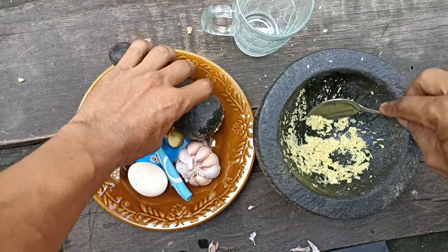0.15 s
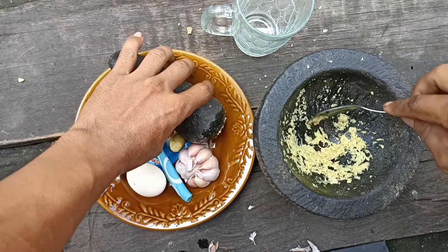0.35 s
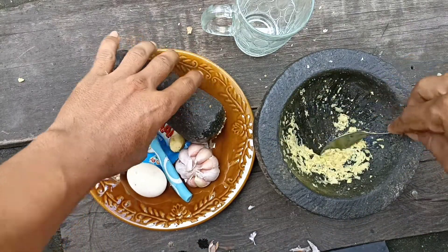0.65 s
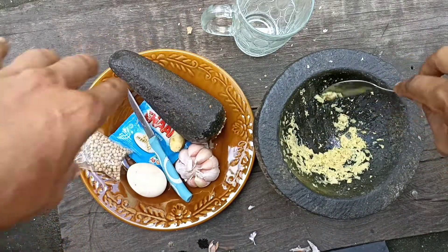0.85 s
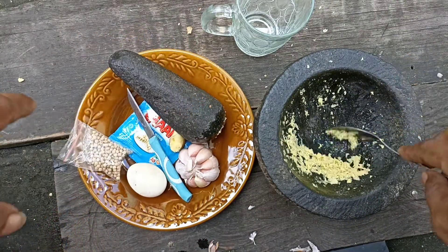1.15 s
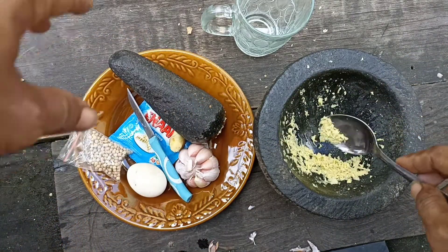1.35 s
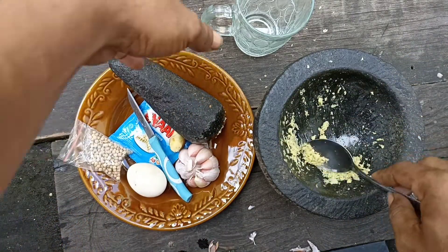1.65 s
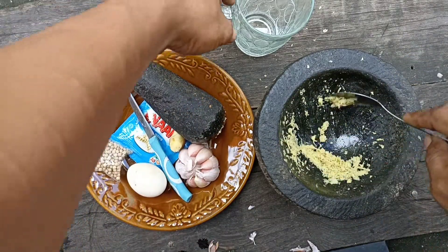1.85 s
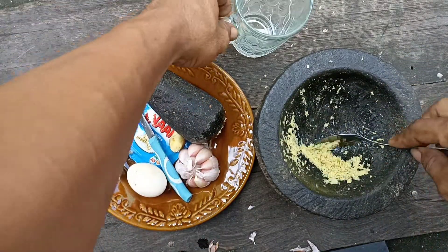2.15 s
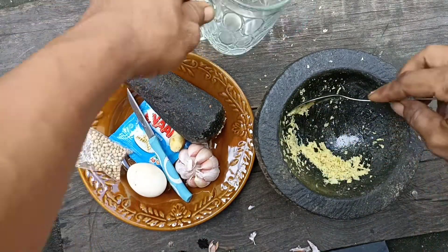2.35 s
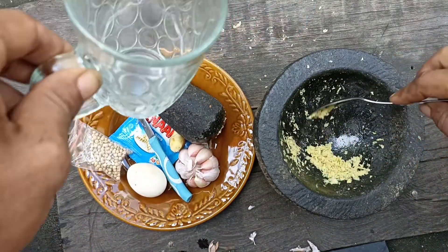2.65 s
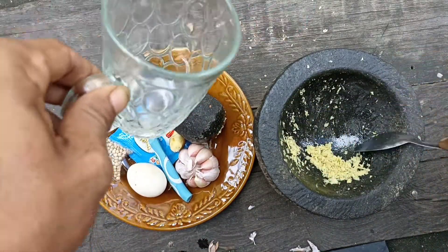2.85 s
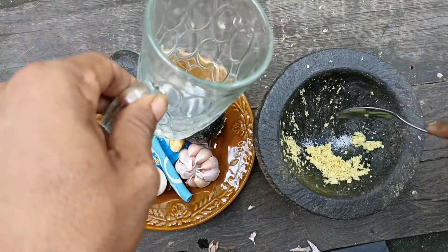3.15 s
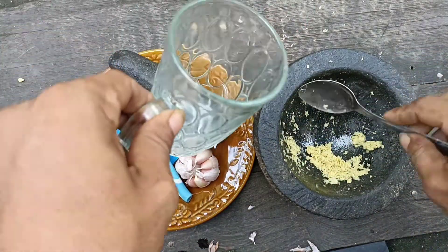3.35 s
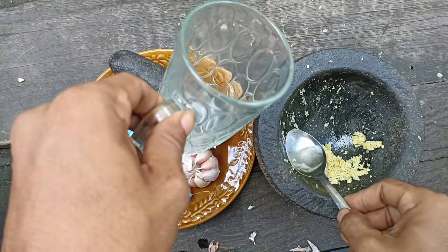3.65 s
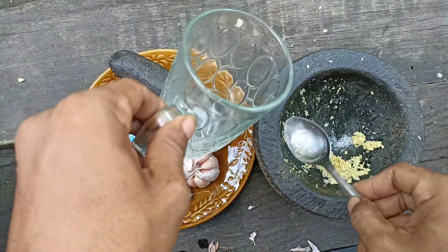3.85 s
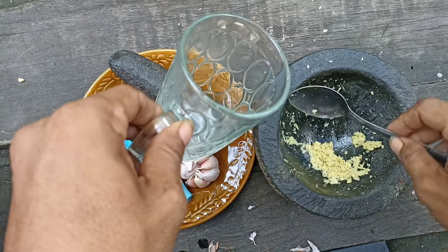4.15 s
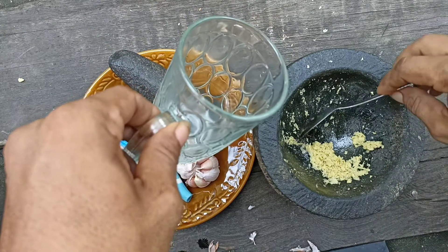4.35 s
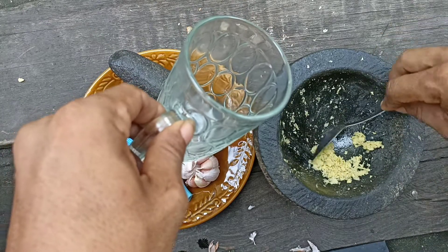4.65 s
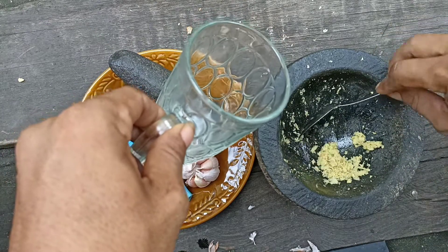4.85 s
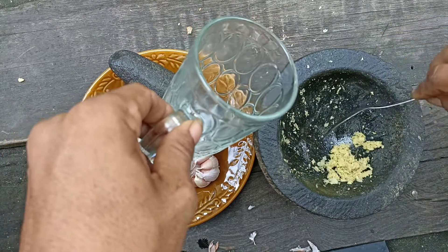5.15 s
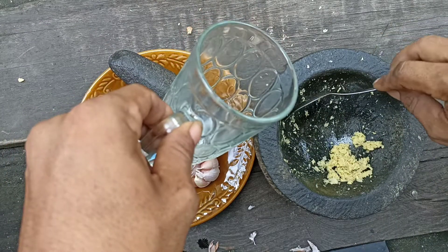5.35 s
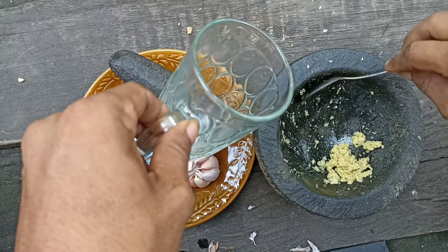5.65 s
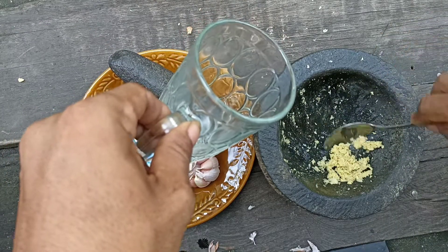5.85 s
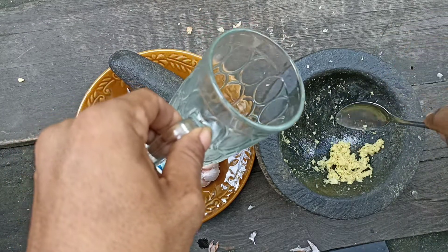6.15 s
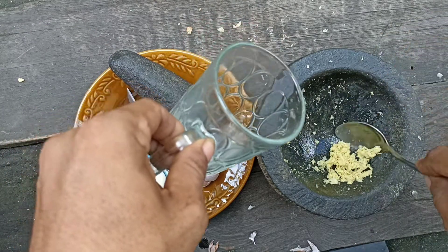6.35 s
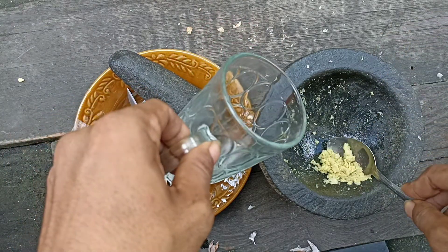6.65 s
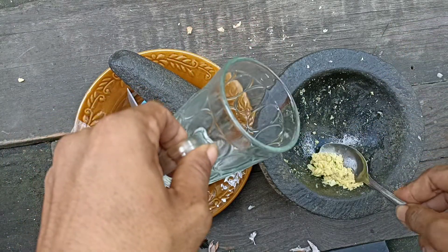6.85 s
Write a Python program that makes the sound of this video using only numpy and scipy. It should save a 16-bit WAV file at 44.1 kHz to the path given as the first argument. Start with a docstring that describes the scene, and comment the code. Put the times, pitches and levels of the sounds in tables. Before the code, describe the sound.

Short bright rasps and sharp clicks of a steel spoon in a stone mortar, after a quick pestle rattle on a plate, over faint outdoor rumble.

```python
"""A steel spoon taps and scrapes paste round a stone mortar; at the start a stone pestle clatters on a plate.
Grit under the spoon's edge is a train of clumped clicks, convolved with the ring of stone and steel.
Knocks and bumps are half-sine pushes that excite the decaying modes of the plate and the wooden table.
Outdoor air with a distant, swelling rumble is shaped random spectra; a faint low note is a decaying sine.
A short diffuse return is added, and two close microphone ports of unlike colour pick up the whole."""
import sys
import numpy as np
from scipy import signal
from scipy.fft import rfft, irfft, next_fast_len
from scipy.io import wavfile
from scipy.ndimage import uniform_filter1d

SR = 44100
rng = np.random.default_rng(int(sys.argv[2]) if len(sys.argv) > 2 else 0)


def generate_wav(signal):
    """Clip the signal to [-1, 1] and save it as 16-bit WAV at the path in sys.argv[1]."""
    frames = np.transpose(np.atleast_2d(signal))
    scaled = np.clip(frames, -1, 1) * 32767
    pcm = np.round(scaled).astype(np.int16)
    wavfile.write(sys.argv[1], SR, pcm)


N = 309385  # length in samples

# Drags of the spoon's edge; hollow and shine are relative to the rasp, at full pressure:
# start_s, rise_s, hold_s, fall_s, rasp_level_db, hollow_db, first_pitch_hz, last_pitch_hz, shine_db
STROKES = [(0.0, 0.00067, 0.012, 0.028, -29.5, -3.3, 2940, 2960, 3),
           (0.024, 0.005, 0.099, 0.12, -29, 1.5, 3800, 3000, -3),
           (0.137, 0.0405, 0.0275, .07, -26, -5, 3500, 3600, 2),
           (0.34, 0.013, 0.027, 0.087, -67.5, 22, 2210, 2320, -5),
           (0.454, 0.034, 0.037, 0.035, -35, -10.5, 3457, 3500, 0),
           (0.744, 0.033, 0.066, .012, -55, 6.5, 1580, 1680, -1),
           (0.844, 0.0033, 0.17, 0.049, -30.5, 1.5, 4170, 2696, 7.5),
           (1.534, 0.014, 0.051, 0.035, -27.5, 8.5, 1958, 2184, 7.5),
           (1.907, 0.08, 0.15, 0.055, -50, -7, 3400, 3200, 5.5),
           (2.359, .14, .045, 0.027, -31.5, 3.5, 2470, 2900, 3),
           (2.844, 0.0025, 0.011, 0.12, -36.5, 3.5, 3186, 3400, 1),
           (3.013, 0.0021, 0.038, 0.058, -27.5, 1.5, 3480, 2420, 3.5),
           (3.336, 0.017, .022, 0.31, -53, 7, 1319, 2500, -8),
           (3.588, 0.027, 0.06, 0.0557, -23, 5.5, 2054, 3000, 2.5),
           (3.777, 0.021, 0.063, 0.011, -50.5, -0.5, 2679, 2400, -5),
           (3.872, 0.0071, 0.064, 0.071, -22, 4.5, 2130, 3070, 3),
           (4.176, 0.021, 0.0052, 0.088, -42.5, -0.5, 3002, 3020, 1),
           (4.302, 0.031, 0.099, 0.029, -71, 19.5, 1400, 1498, -8),
           (4.422, 0.032, 0.075, 0.049, -43, -1, 3330, 2400, 1.5),
           (4.546, 0.053, 0.072, 0.062, -30, 6.5, 2830, 2310, 1.5),
           (4.914, 0.021, 0.056, 0.054, -27, 4.5, 2835, 2592, 3.5),
           (5.061, 0.026, 0.14, 0.089, -66, 18.5, 1306, 2735, -9),
           (5.408, 0.023, .018, 0.019, -23.5, -3.5, 2357, 2031, 3.5),
           (5.457, 0.0073, 0.067, 0.049, -30, 2, 1220, 1570, 3),
           (5.704, 0.011, 0.11, 0.023, -27, -2.5, 4499, 4760, 3),
           (5.826, 0.02, 0.034, 0.051, -29, 2.5, 2982, 2278, 6),
           (6.082, 0.0051, 0.16, 0.024, -47, -3, 2161, 2220, 2),
           (6.699, .011, 0.022, 0.03, -19.5, -1.5, 2223, 2296, -6),
           (6.921, 0.0069, 0.023, 0.057, -15.5, -4.5, 2395, 2134, -4.5)]
# Landings of the edge on the stone; hollow and shine are relative to the rasp:
# start_s, drive_level_db, hollow_db, hollow_pitch_hz, shine_db, chatter_t60_s
TAPS = [(0.5342, -14.5, -5, 3220, 1.5, 0.057), (0.5703, -18.5, -7, 3600, 2, 0.065),
        (0.5904, -16, -11.5, 2280, 7, 0.028), (0.8486, -11, 2.5, 4460, 6, 0.022),
        (1.5251, -9.5, 2, 4368, 6.5, 0.031), (1.899, -9.5, -1, 2990, 3.5, 0.015),
        (2.8417, -4.5, 2, 2194, 8.5, 0.0073), (3.018, -8.5, 0.5, 2220, 8, 0.019),
        (3.3558, -40.5, 4, 1215, -6, 0.057), (3.564, -27, 5, 1757, 4.5, 0.07),
        (3.6299, -14.5, -15, 2053, 16, 0.035), (3.8794, -9, -3, 2080, 7.5, 0.052),
        (4.1734, -26.5, -1, 1184, 10, 0.042), (4.424, -12, -1.5, 5200, 1.5, 0.009),
        (4.533, -37, 19, 2598, -6, .015), (4.583, -15.5, 12.5, 3040, 1.5, 0.022),
        (4.8778, -18.5, 3.5, 1765, -0.5, 0.017), (5.36, -31.5, 5.5, 3490, -14, .015),
        (5.662, -8.5, 7.5, 4690, 9.5, 0.0098), (5.842, -16.5, -5, 3000, 8, 0.058),
        (6.0782, -15, -5, 4474, 5, 0.042), (6.328, -23, -3, 2150, -5, 0.084),
        (6.71, -11, -8, 2137, -3, 0.034), (6.7386, -33, -8, 1992, -4, 0.022),
        (6.926, -16.5, 1, 2148, 15, 0.05)]
# The edge sticks, then slips in one short burst: start_s, level_db, hollow_db, shine_db, length_s
SLIPS = [(0.859, -20.5, 0.5, 5.5, .03), (0.999, -35, -5, 17, 0.0088), (1.039, -56, 14, 0, 0.0085),
         (2.064, -31, 0.1, 3, 0.014), (2.095, -40.5, 8, 5, 0.034), (2.477, -32, -14, 4.5, 0.033),
         (3.94, -19.5, 1.5, 2, 0.034), (4.191, -37, -19, 3, 0.0076), (4.921, -31.5, 3.5, 5.5, 0.032),
         (4.974, -16.5, -8, -19, 0.02), (5.007, -25, -0.5, -7, 0.011), (5.715, -12.5, -6.5, -2, 0.013),
         (5.774, -18, -9, 2, 0.026), (6.136, -45, 3.5, 8.5, .03), (6.232, -41, -5, 12.5, 0.014),
         (6.274, -36.5, 1, 7.5, 0.033), (6.353, -30, -4.5, 4.5, 0.02), (6.399, -36, 1.5, 4.5, 0.049),
         (6.454, -32, 1.5, 2.5, 0.022), (6.477, -41.5, 1, 0, 0.019), (6.502, -35, 4.5, 2, 0.023),
         (6.553, -30, 6, 1, 0.0069), (6.574, -32, 4.5, 2.5, 0.024), (6.617, -30.5, 4.5, 2, 0.013)]
# Relative spectrum of the stone's dense ring: frequency_hz, density_db_per_hz
STONE_SPECTRUM = [(290, -53), (500, -6.5), (1330, -13), (2130, -0.5), (2600, -9), (5030, -4), (5890, -12),
                  (6700, 1), (9190, -15), (11600, -14), (15400, -52)]
# Modes of spoon and mortar, relative strengths: frequency_hz, level_db, t60_s
SPOON_MODES = [(1380, -21.5, 0.039), (2005, -10.5, 0.029), (2460, 2, 0.0043), (3094, -3.5, 0.03),
               (3310, 0, 0.0028), (3984, -6, 0.015), (5000, -26.5, 0.0069), (4880, -11, 0.0083),
               (6556, -4.5, 0.022), (11760, -7, 0.028), (13250, 4, 0.0075), (14600, -5, 0.0075)]
# Bands of the rasp, the hollow and the shine, one row each: low_hz, high_hz
PART_BANDS = [(5000, 9700), (800, 5000), (9700, 17000)]
# The pestle meets the plate: start_s, plate_level_db, table_level_db
KNOCKS = [(0.0407, -11.5, -30.5), (0.0636, -15, -31.5), (0.1073, -12, -30.5), (0.134, -21, -35.5),
          (0.194, -26.5, -24), (0.2865, -35, -35), (0.2991, -19.5, -34), (0.322, -26.5, -39.5)]
# Modes of the plate, relative strengths: frequency_hz, level_db, t60_s
PLATE_MODES = [(860, 1, 0.022), (1257, -13, 0.14), (1503, -7.5, 0.081), (1640, -4.5, 0.094),
               (1540, 1.5, 0.034), (1984, -16.5, 0.26), (2210, -1.5, 0.039), (2900, -14, 0.13),
               (3800, -21, 0.2), (5200, -14, 0.059), (6300, -10.5, .05)]
# Soft bumps on the table top: start_s, peak_db
BUMPS = [(0.946, -28), (0.964, -45), (1.899, -31.5), (1.959, -34.5), (2.092, -25.5), (2.15, -35),
         (2.837, -36), (3.019, -34.5), (3.361, -37.5), (5.148, -33.5), (5.761, -32.5), (5.819, -30.5)]
# Modes of the table top, relative strengths: frequency_hz, level_db, t60_s
TABLE_MODES = [(125, -0.5, 0.15), (163.5, -1.5, 0.19), (266.4, -2, 0.13), (338.5, 5.5, 0.11),
               (413, 5.5, 0.049), (637, 5, 0.064), (860, 14, 0.023)]
# Relative spectrum of the outdoor air: frequency_hz, density_db_per_hz
AIR_SPECTRUM = [(15, -82), (25, -46), (86, 0.5), (147, -2), (233, -8.5), (420, -5), (468, -11),
                (780, -12.5), (916, -14), (1840, -17), (5120, -26.5), (11800, -27.5), (15400, -34)]
# Swells of the low background, used relative to their median: time_s, level_db
RUMBLE = [(0.4, -57.5), (0.6, -61), (1.84, -57.5), (1.93, -55.5), (3.29, -63), (3.49, -58), (4.25, -59),
          (4.54, -45), (4.73, -53), (5.85, -55.5), (7.01, -52.5)]
# Left-right likeness of the background: frequency_hz, correlation (0 to 1)
LIKENESS = [(60, 0.31), (300, 0.71), (650, 0.49), (1400, 0), (3000, 0.059)]
# Colour of the ports: frequency_hz, left_over_right_db
PORTS = [(500, -0.5), (5000, -3), (7600, -9), (9300, -5), (11500, 11.5), (15000, 8)]
# Faint low note; a negative start counts back from the end: start_s, frequency_hz, level_db, t60_s
NOTE = (-1.5, 433.5, -40.5, 0.1)

AIR_DB = -48  # RMS level of the background
EDGE_HZ = 16600  # upper band limit
LIFT_DB = -37.5  # level change at the two ends of a stroke, as the edge meets and leaves the stone
FALL_CURVE = 0.84  # under 1: the rasp drops sooner as the edge lifts, then trails off
LIGHT_HOLLOW = 0.16  # a light touch is more hollow: dB of hollow gained per dB of level lost
STROKE_THROUGH = 0.52  # share of the broad ring beside the favoured pitch, for a hollow of 0 dB
HOLLOW_FOCUS = 0.45  # dB of that broad ring lost per dB of hollow: a hollow stroke is more pitched
SLIP_WIDTH, SLIP_THROUGH = 0.17, 0.11  # favoured pitch in a slip: width / pitch, share of broad ring


def gain_of(db):
    """Decibel law: 20 dB is a factor of ten in amplitude."""
    return 10 ** (np.asarray(db) / 20)


def evened(x):
    """Normalisation to unit root-mean-square amplitude."""
    return x / np.sqrt(np.mean(x ** 2) + 1e-20)


def read(points, hz):
    """Interpolation of a spectrum along a logarithmic frequency axis."""
    f, value = np.transpose(points)
    return np.interp(np.log(hz + 1), np.log(f + 1), value)


def add(mix, start_s, sound):
    """Superposition: a sound adds to the pressure already present."""
    part = mix[:, round(start_s * SR):][:, :sound.shape[1]]
    part += sound[:, :part.shape[1]]


def ring(modes, size, spread_db, turns):
    """Modal decay: a blow excites each mode at a random strength and phase, unlike at the two ports."""
    hz, db, t60 = np.transpose(modes)[..., None]
    t = np.arange(size) / SR
    shared, left, right = rng.standard_normal((3, len(hz), 1))
    db = db + spread_db * (shared + 0.5 * np.array([left, right]))
    phase = 2 * np.pi * turns * rng.uniform(-0.5, 0.5, (2, len(hz), 1))
    modes_heard = gain_of(db - 60 * t / t60) * np.sin(2 * np.pi * hz * t + phase)
    return modes_heard.sum(1)


def body(size=2048, stone_t60=0.013, steel_db=-1):
    """Impulse response: a click rings dense stone and the modes of the steel, here split in three bands."""
    t, hz = np.arange(size) / SR, np.fft.rfftfreq(size, 1 / SR)
    shared, left, right = rng.standard_normal((3, size))
    stone = (1.08 * shared + np.array([left, right])) * gain_of(-60 * t / stone_t60)
    stone = irfft(rfft(stone) * gain_of(read(STONE_SPECTRUM, hz)))
    stone[:, size // 2:] = 0  # nothing sounds before the click: the wrapped end is cut
    steel = ring(SPOON_MODES, size, spread_db=2.5, turns=0.8)
    both = evened(stone) + gain_of(steel_db) * evened(steel)
    both[1] = np.roll(both[1], rng.integers(0, 12))  # the far port hears it later, by samples
    filters = [signal.butter(3, band, "band", fs=SR, output="sos") for band in PART_BANDS]
    return np.array([signal.sosfilt(sos, both) for sos in filters])


def grit(size, per_s=9000, size_db=2.5, clump_db=2.2, clump_s=0.004):
    """Stick-slip friction: random clicks of uneven size come in clumps."""
    clicks = (rng.random(size) < per_s / SR) * rng.choice([-1., 1.], size)
    clicks *= gain_of(size_db * np.minimum(rng.exponential(1, size), 5))
    clump_size = max(round(clump_s * SR), 1)
    clumps = evened(uniform_filter1d(rng.standard_normal(size), clump_size))
    return evened(clicks * gain_of(clump_db * clumps))


def sounded(drive, parts, level_db, hollow_db, hollow_hz, shine_db, width=0.24, through=0.25):
    """Source and resonator: clicks excite a body, and the air under the spoon favours one hollow pitch."""
    rasp, hollow, shine = parts
    b, a = signal.iirpeak(np.mean(hollow_hz), 1 / width, SR)
    hollow = through * hollow + signal.lfilter(b, a, hollow)
    parts = np.array([rasp, hollow, shine])
    energy = (parts ** 2).sum(2).mean(1)
    parts = parts / np.sqrt(energy)[:, None, None]
    gains = gain_of([level_db, level_db + hollow_db, level_db + shine_db])
    drives = drive * gains.reshape(3, -1)
    return signal.fftconvolve(drives[:, None], parts, axes=2).sum(0)


def spoon():
    """Contact of steel on stone: one set of contact points serves strokes, taps and slips."""
    bodies = np.array([body() for _ in range(24)])
    return strokes(bodies) + taps(bodies) + slips(bodies)


def strokes(bodies, step=1200):
    """Sliding friction: grit drags under the edge and, as the contact point moves, the body changes."""
    mix = np.zeros((2, N))
    fade = np.sin(np.pi * np.arange(2 * step) / (2 * step))
    for s, rise, hold, fall, db, hollow_db, first_hz, last_hz, shine_db in STROKES:
        corners = np.cumsum(np.abs([0, rise, hold, fall]))
        t = np.arange(0, corners[-1], 1 / SR)
        landing = np.interp(t, corners, [1, 0, 0, 0])
        lifting = np.interp(t, corners, [0, 0, 0, 1]) ** FALL_CURVE
        press_db = LIFT_DB * (landing + lifting)
        pitch_hz = first_hz + (last_hz - first_hz) * t / t[-1]
        columns = (db + press_db, hollow_db - LIGHT_HOLLOW * press_db, pitch_hz, shine_db + 0 * t)
        broad = STROKE_THROUGH * gain_of(-HOLLOW_FOCUS * hollow_db)
        drive = grit(SR // 2)[:len(t)]
        # overlapping sections, each played on another contact point
        for start in range(-step, len(t), step):
            part = np.arange(max(start, 0), min(start + 2 * step, len(t)))
            controls = [column[part] for column in columns]
            faded = drive[part] * fade[part - start]
            section = sounded(faded, rng.choice(bodies), *controls, through=broad)
            add(mix, s + t[part[0]], section)
    return mix


def air():
    """Partly correlated noise: random short-time spectra with drifting patches, whose low part swells."""
    frames, hz = N // 256 + 5, np.fft.rfftfreq(1024, 1 / SR)
    a, b, c, d, patches = rng.standard_normal((frames, 513, 5)).T
    patches = evened(uniform_filter1d(uniform_filter1d(patches, 12, 0), 14, 1))
    s, db = np.transpose(RUMBLE)
    swell_db = np.interp(np.arange(frames) * 256 / SR, s, db - np.median(db))
    # how far each frequency follows the swell
    share = read([(60, 0.29), (400, 0.96), (1500, 0.97), (5000, 0.38)], hz)[:, None]
    same = np.clip(read(LIKENESS, hz), -1, 1)[:, None]
    left, other = a + 1j * b, c + 1j * d
    spectra = np.array([left, same * left + np.sqrt(1 - same ** 2) * other])
    spectra *= gain_of(read(AIR_SPECTRUM, hz)[:, None] + 1.8 * patches + share * swell_db)
    noise = signal.istft(spectra, nperseg=1024, noverlap=768)[1][:, :N]
    return gain_of(AIR_DB) * evened(noise)


def blow(ms):
    """Contact time: a half-sine push sounds duller the longer it lasts."""
    length = ms * SR / 1000
    push = np.sin(np.pi * np.arange(1, length) / length)
    return push[None] / push.sum()


def above(x, hz):
    """Radiation efficiency: small objects radiate little below their lowest mode."""
    return signal.sosfilt(signal.butter(2, hz, "high", fs=SR, output="sos"), x)


def pestle():
    """Impact of coupled bodies: each knock cracks, rings the plate and thumps the table under it."""
    mix, t = np.zeros((2, N)), np.arange(8000) / SR
    for s, db, table_db in KNOCKS:
        crack = 0.52 * rng.standard_normal(len(t)) * gain_of(-60 * t / 0.036)
        thud = 4.8 * rng.standard_normal(len(t)) * gain_of(-60 * t / 0.18)  # dense ring of the heavy stone
        plate = ring(PLATE_MODES, len(t), spread_db=3.5, turns=0.2)
        table = ring(TABLE_MODES, len(t), spread_db=2.5, turns=0.15)
        plate = signal.fftconvolve(above(plate + crack, hz=755), blow(ms=0.097))
        table = signal.fftconvolve(above(table + thud, hz=193), blow(ms=0.61))
        port_db = np.array([[-1.8], [1.8]])  # the table is louder on the right
        add(mix, s, gain_of(db) * plate)
        add(mix, s, gain_of(table_db + port_db) * table)
    return mix


def taps(bodies):
    """Impact with rebound: one hard click, then a chatter of grit that decays exponentially."""
    mix, t = np.zeros((2, N)), np.arange(3000) / SR
    for s, *controls, t60 in TAPS:
        drive = 0.35 * grit(len(t)) * gain_of(-60 * t / max(t60, 0.004))
        drive[0] = 2.37  # the hard click
        add(mix, s, sounded(drive, rng.choice(bodies), *controls))
    return mix


def slips(bodies):
    """Release of stuck friction: even bursts of grit start and stop quickly, over a faint decaying drag."""
    mix, t = np.zeros((2, N)), np.arange(3000) / SR
    when_s, pitch_hz = np.transpose(STROKES)[[0, 6]]
    for s, db, hollow_db, shine_db, length in SLIPS:
        burst = np.minimum(t * 400, 1) * np.clip((length - t) / 0.0013 + 1, 0, 1)
        drag = 0.018 * gain_of(-60 * t / 0.033)
        drive = grit(len(t)) * (burst + drag)
        hollow_hz = np.interp(s, when_s, pitch_hz)  # the spoon lies as in the strokes around it
        sound = sounded(drive, rng.choice(bodies), db, hollow_db, hollow_hz, shine_db,
                        width=SLIP_WIDTH, through=SLIP_THROUGH)
        add(mix, s, sound)
    return mix


def bumps():
    """Forced modes: hand, glass and mortar nudge the table top with a soft push and a short shuffle."""
    mix, t = np.zeros((2, N)), np.arange(4000) / SR
    for s, db in BUMPS:
        shuffle = 0.03 * rng.standard_normal(len(t)) * gain_of(-60 * t / 0.24)
        shuffle[0] = 1  # the push itself
        table = ring(TABLE_MODES, 8000, spread_db=2, turns=0.1)
        force = signal.fftconvolve(shuffle[None], blow(ms=1.44))
        nudge = signal.fftconvolve(table, force)
        add(mix, s, gain_of(db) * nudge / abs(nudge).max())
    return mix


def low_note():
    """Damped oscillation: one soft low sine swells in quickly and dies away."""
    s, hz, db, t60 = NOTE
    t, mix = np.arange(9000) / SR, np.zeros((2, N))
    swell = np.clip(t / 0.015, 0, 1)
    tone = gain_of(db - 60 * t / t60) * np.sin(2 * np.pi * hz * t) * swell
    add(mix, s, np.array([tone, 0.92 * tone]))
    return mix


def yard(x, t60=0.16, size=6000):
    """Diffuse reflection: table top and nearby walls return a short, exponentially decaying noise tail."""
    tail = rng.standard_normal((2, size)) * gain_of(-60 * np.arange(size) / SR / t60)
    return signal.fftconvolve(x, tail / np.linalg.norm(tail[0]), axes=1)[:, :N]


def scene():
    """Superposition of the near sources, their diffuse return and the outdoor air."""
    near = spoon() + pestle() + bumps() + low_note()
    return near + gain_of(-15.0) * yard(near) + air()


def record(dry):
    """Port resonance: deep bass is lost, left and right differ in colour, peaks clip, the band is limited."""
    size = next_fast_len(N)
    lean = gain_of(read(PORTS, np.fft.rfftfreq(size, 1 / SR)))
    ports = np.array([lean, 1 + 0 * lean]) * np.sqrt(2 / (1 + lean ** 2))  # total power is kept
    dry = signal.sosfilt(signal.butter(3, 75, "high", fs=SR, output="sos"), dry)
    coloured = irfft(rfft(dry, size) * ports, size)[:, :N]
    heard = np.clip(coloured, -1, 1)
    band_limit = signal.firwin(511, EDGE_HZ, window=("kaiser", 12), fs=SR)
    return signal.oaconvolve(heard, band_limit[None], "same")


dry = scene()
out = record(dry)
generate_wav(out)
```